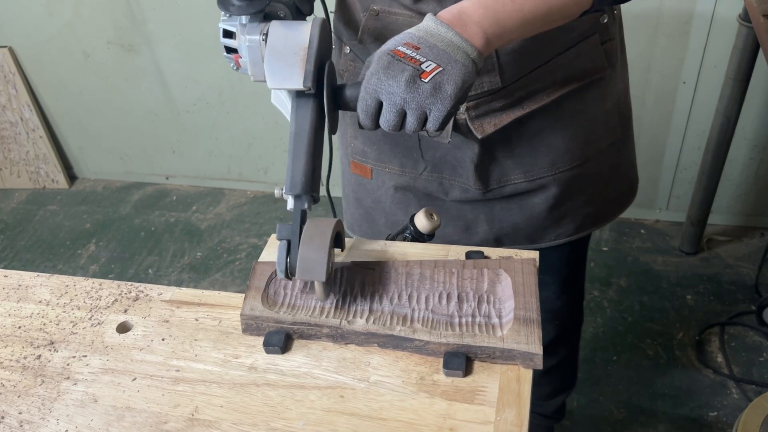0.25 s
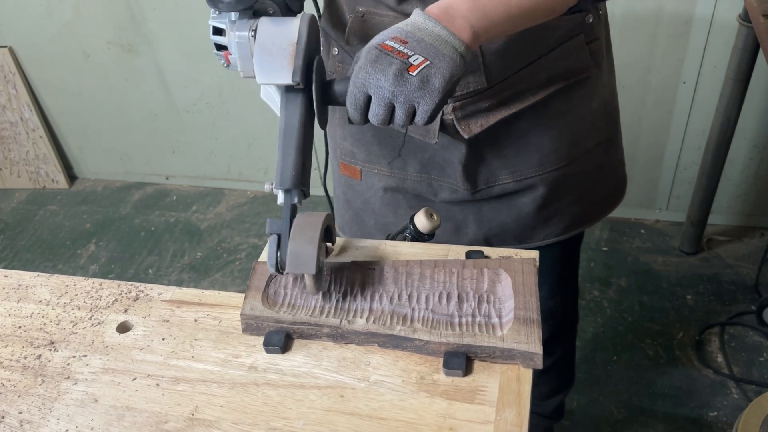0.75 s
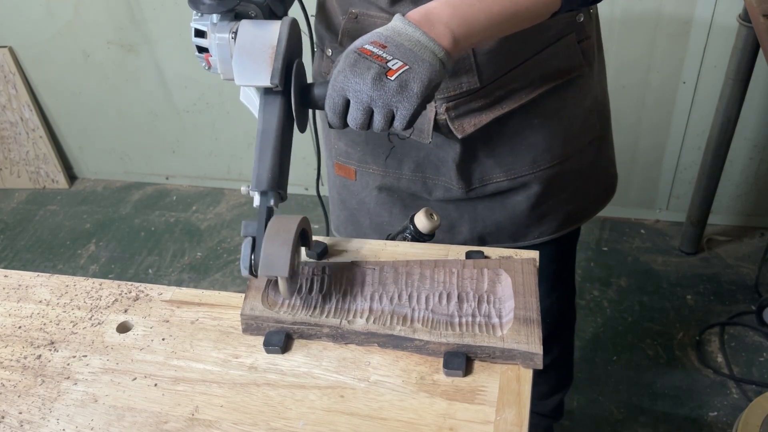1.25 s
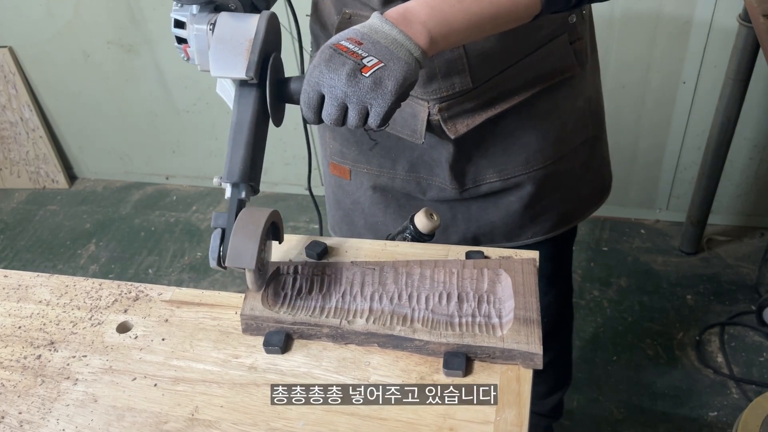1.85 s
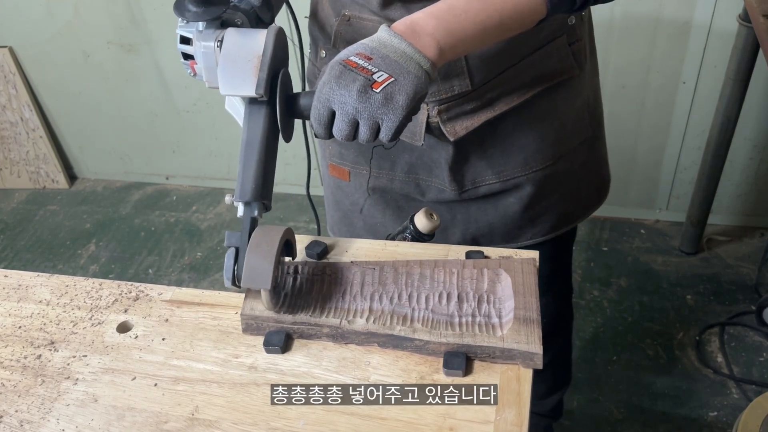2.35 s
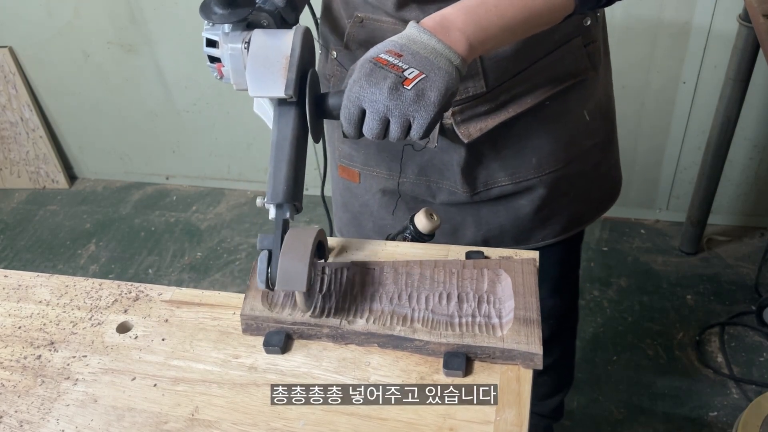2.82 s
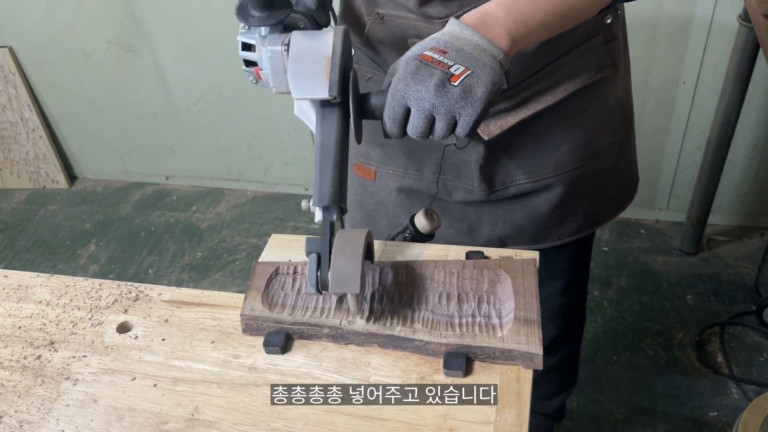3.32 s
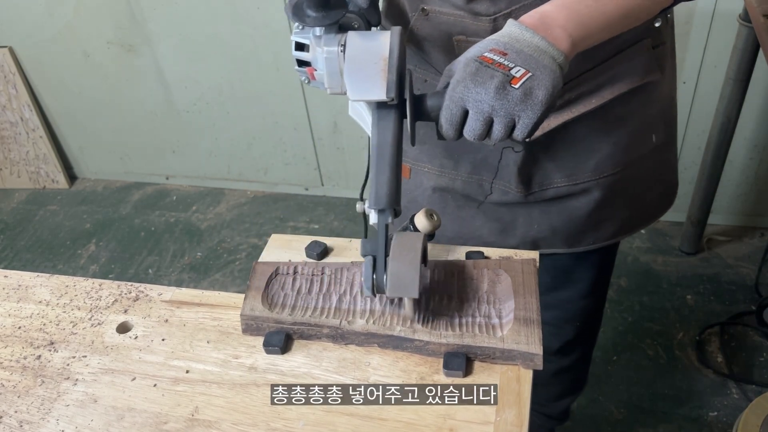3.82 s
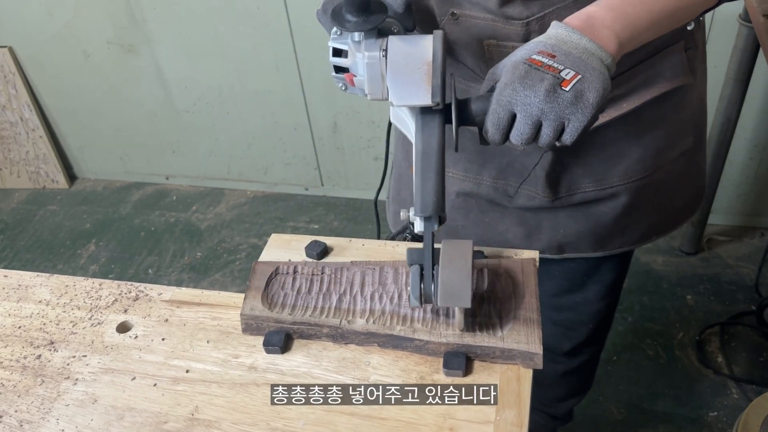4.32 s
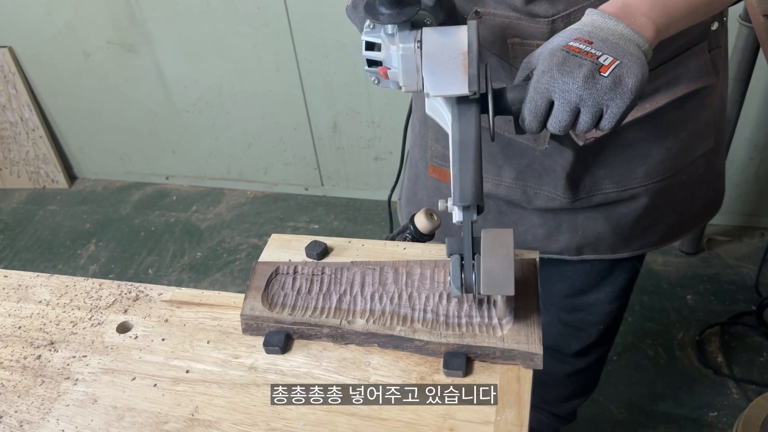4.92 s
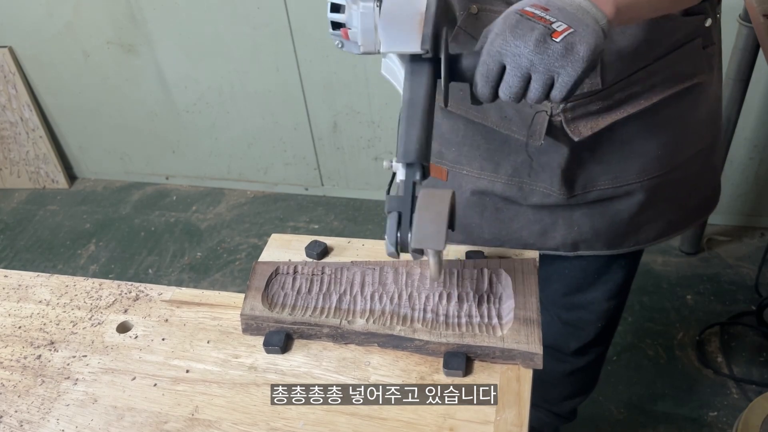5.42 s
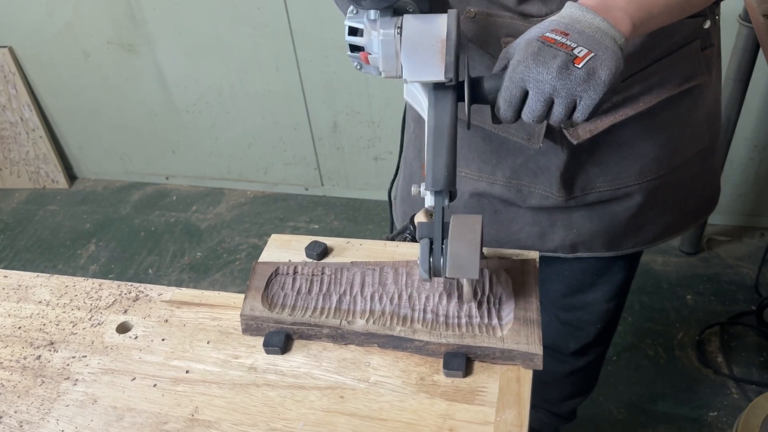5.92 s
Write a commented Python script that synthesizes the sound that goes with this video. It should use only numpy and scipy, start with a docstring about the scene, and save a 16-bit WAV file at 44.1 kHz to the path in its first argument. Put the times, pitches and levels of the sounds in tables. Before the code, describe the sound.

A running belt sander pecks at a wooden tray in a workshop, its brief buzzing rasps speeding up and then thinning out.

```python
"""An angle grinder with a narrow sanding-belt arm dabs rows of scallops into a wooden tray in a workshop.
From the start the fan rushes, the belt hisses and the drive whines. At each dab the contact wheel
chatters on the wood once a turn, the grit rasps, and the motor sags and picks up again. The dabs quicken,
the bench gives a faint scuff near 2.9 s, and the arm crosses the tray from left to right as the chirp
under the wheel falls in pitch. After 5 s the dabs thin out."""
import sys
import numpy as np
from scipy import signal
from scipy.fft import rfft, irfft, next_fast_len
from scipy.io import wavfile

SR = 44100
rng = np.random.default_rng(int(sys.argv[2]) if len(sys.argv) > 2 else 0)


def master(y):
    """Save y as 16-bit WAV."""
    cut = np.clip(np.atleast_2d(y).T, -1, 1)
    pcm = np.round(cut * 32767)  # scale
    wavfile.write(sys.argv[1], SR, pcm.astype(np.int16))


N = 272097
TIME = np.arange(N) / SR
WHEEL_HZ, BEARING_HZ, SPINDLE_HZ = 450.3, 1196.4, 168.8   # at free speed
ATTACK_S, RELEASE_S = 0.0078, .013   # the wheel lands and lifts alike at every dab


def from_db(db):
    """Amplitude ratio of a level in decibels."""
    return 10 ** (np.asarray(db) / 20)

def rms_one(x):
    """Normalisation to rms 1."""
    return x / np.sqrt(np.mean(x ** 2) + 1e-20)

def in_time(rows):
    """Linear interpolation of each column of a curve at every sample."""
    times, *columns = np.transpose(rows)
    return [np.interp(TIME, times, column) for column in columns]

def drift(rate_hz):
    """Random fluctuation: noise low-passed at the given rate, rms 1."""
    hz = np.arange(N // 2 + 1) * SR / N
    return rms_one(irfft(rfft(rng.standard_normal(N)) / (1 + (hz / rate_hz) ** 4), N))

def noise(spectrum):
    """Stationary noise shaped to a spectral envelope, rms 1."""
    hz, db = np.transpose(spectrum)
    size = next_fast_len(N)
    bins = np.maximum(np.arange(size // 2 + 1) * SR / size, 1)
    skirt = np.minimum(bins / hz[0], 1) ** 2
    colour = from_db(np.interp(np.log(bins), np.log(hz), db)) * skirt
    return rms_one(irfft(rfft(rng.standard_normal(size)) * colour, size)[:N])

def resonant_noise(hz, width_hz):
    """Narrow-band noise from two passes through one resonator, rms 1."""
    b, a = signal.iirpeak(hz, hz / width_hz, fs=SR)
    return rms_one(signal.lfilter(b, a, signal.lfilter(b, a, rng.standard_normal(N))))

def angle(hz):
    """Phase as the integral of frequency."""
    return 2 * np.pi * np.cumsum(hz) / SR

def tone(phase):
    """A sinusoid of rms 1."""
    return np.sqrt(2) * np.sin(phase)

def partials(turn, orders, levels_db, scatter_db):
    """Fourier synthesis: harmonics of the wheel's rotation with scattered levels and phases, rms 1."""
    gains = from_db(levels_db + scatter_db * rng.standard_normal(len(orders)))
    phases = rng.uniform(0, 2 * np.pi, (len(orders), 1))
    return gains @ tone(np.outer(orders, turn) + phases) / np.linalg.norm(gains)

def at_place(rows, place):
    """Harmonic numbers and their levels, interpolated between the left and right ends of the tray."""
    orders, left_db, right_db = np.transpose(rows)
    return orders, left_db + (right_db - left_db) * place

def workshop(x, t60_s=0.28, tail_db=-10.5, echo_s=.022, echo_db=-17):
    """Reverberation: an exponential diffuse tail and one dull reflection off the wall behind the bench."""
    t = TIME[:SR // 2]
    tail = rng.standard_normal(len(t)) * from_db(-60 * t / t60_s) * (t > .005)
    diffuse = signal.fftconvolve(x, tail / np.linalg.norm(tail))[:N]
    dull = signal.sosfilt(signal.butter(2, 5000, fs=SR, output="sos"), x)
    echo = np.interp(TIME - echo_s, TIME, dull, left=0)
    return x + from_db(tail_db) * diffuse + from_db(echo_db) * echo

# The scuff's envelope: time of the peak in seconds, half-width in seconds, peak level in dB.
SCUFF_ENVELOPE = (2.875, 0.057, -66)
# Modes of the bench. Each row: frequency in Hz, bandwidth in Hz, relative level in dB.
BENCH_MODES = [(275, 79, 0), (390, 140, -1.5), (540, 105, -2)]
def scuff():
    """Frictional excitation: a brief dull rub drives the low modes of the bench."""
    peak_s, half_width_s, level_db = SCUFF_ENVELOPE
    rub = rms_one(sum(from_db(db) * resonant_noise(hz, width) for hz, width, db in BENCH_MODES))
    return from_db(level_db) * np.exp(-((TIME - peak_s) / half_width_s) ** 2) * rub

# Spectrum of the fan's air. Each row: frequency in Hz, relative spectral density in dB.
FAN_SPECTRUM = [(30, -42), (60, -40), (90, -23), (125, -10), (200, -9), (330, -6), (480, -4), (700, -1.5),
                (950, 3.5), (1450, 3), (1750, 8), (2100, 1), (2700, 0.5), (5000, -21)]
def fan(level_db=-59):
    """Flow noise: air from the fan makes a steady broadband rush."""
    return from_db(level_db) * noise(FAN_SPECTRUM)

# Course of the commutator's whistle. Each row: time in seconds, level in dB.
WHISTLE_LEVELS = [(0, -52), (.7, -51), (1.8, -60), (2.6, -52), (3.4, -55), (4.5, -71), (5.2, -62),
                  (5.45, -51), (6.17, -53)]
def commutator(speed, free_hz=11968, line_db=-0.5, airy_db=-8):
    """Frequency modulation: the whistle glides with the motor's speed inside a narrow band of hiss."""
    level_db, = in_time(WHISTLE_LEVELS)
    line = from_db(line_db + 1.5 * drift(25)) * tone(angle(free_hz * speed * (1 + 0.00021 * drift(40))))
    airy = from_db(airy_db) * resonant_noise(free_hz * speed.mean(), width_hz=320)
    return from_db(level_db) * (line + airy)

def drive(speed, place):
    """Rotational tones, locked to the motor: under load the wheel's hum fades and the bearing grows."""
    percent_lost = 100 * (1 - speed)
    hum_db = -54.5 - 5 * percent_lost
    bearing_db = -71.5 + 4.5 * percent_lost + 7.5 * place   # louder with the arm on the right
    phase_per_hz = angle(speed * (1 + 0.00036 * drift(40)))
    hum = from_db(hum_db + 0.49 * drift(15)) * tone(3 * WHEEL_HZ * phase_per_hz)
    octave = from_db(hum_db - 2 + 1.8 * drift(25)) * tone(6 * WHEEL_HZ * phase_per_hz + 0.2 * drift(40))
    octave *= 1 + 0.32 * drift(90)   # roughness
    bearing = from_db(bearing_db + 1.5 * drift(18)) * tone(BEARING_HZ * phase_per_hz)
    spindle = from_db(-84.5 + 1.9 * drift(12)) * tone(SPINDLE_HZ * phase_per_hz)
    return hum + octave + bearing + spindle

# Belt hiss at either end of the tray. Each row: frequency in Hz, relative spectral density in dB.
LEFT_HISS_SPECTRUM = [(1500, -33), (2300, -10.5), (3000, -4.5), (4300, -1.5), (4900, -1.5), (5500, 0),
                      (6300, -3.5), (7200, -0.5), (8100, 1), (9300, -3), (11100, -4), (13000, -0.5),
                      (14700, -9.5), (15800, -5.5)]
RIGHT_HISS_SPECTRUM = [(1500, -24.5), (2300, -12), (3000, -7.5), (4200, -1.5), (5000, -1), (5600, -1),
                       (6300, -2.5), (7200, -0.5), (8100, 0.5), (9300, -3.5), (11200, -5), (13100, -1.5),
                       (14700, -5), (15800, -7.5)]
# Modes of the guard and housing. Each row: frequency in Hz, bandwidth in Hz, level in dB re the hiss.
HOUSING_MODES = [(3140, 150, -28), (4436, 150, -26), (5310, 180, -25), (5644, 430, -16.5), (6850, 210, -27),
                 (8220, 400, -21), (9700, 220, -19), (10400, 520, -19), (11660, 180, -28),
                 (13100, 520, -21)]
# The arm's path. Each row: time in seconds, place from 0 (left) to 1 (right), belt sizzle in dB.
ARM_TRAVEL = [(0, 0.025, -57), (2.7, 0.13, -60), (3.3, 0.45, -50), (3.9, 0.75, -44.5), (4.4, 0.89, -46.5),
              (5.0, 1, -48), (6.17, 1, -72)]
def belt(speed, place, left_db=-37.1, right_db=-36.5, mains_ripple_hz=240):
    """Broadband excitation: the belt's hiss rings the housing and shifts colour as the arm travels."""
    _, sizzle_db = in_time(ARM_TRAVEL)
    hiss_db = left_db + (right_db - left_db) * place
    hiss = np.sqrt(1 - place) * noise(LEFT_HISS_SPECTRUM) + np.sqrt(place) * noise(RIGHT_HISS_SPECTRUM)
    hiss += sum(from_db(db) * resonant_noise(hz, width) for hz, width, db in HOUSING_MODES)
    mains = tone(angle(np.full(N, mains_ripple_hz)))
    flutter_db = 0.52 * drift(200) + .12 * tone(angle(WHEEL_HZ * speed)) + .2 * mains
    sizzle = from_db(sizzle_db) * resonant_noise(8100, width_hz=900)
    return (from_db(hiss_db) * hiss + sizzle) * from_db(flutter_db)

# Modes of the tray. Each row: frequency in Hz, bandwidth in Hz, relative dB at the left, at the right.
TRAY_MODES = [(240, 340, -14.5, -20.5), (439, 110, -15.5, -17), (628, 86, -9.5, -22.5),
              (876, 220, 0.5, -2.5), (1053, 163, 1, -1), (1295.5, 53, -4, 6.5), (1790, 510, 1, -2),
              (2240, 125, 4.5, -0.5), (2447, 140, 2.5, 3.5)]
def tray_scrub(place):
    """Modal superposition: grit excites the wood's modes in a mix set by the point of contact; rms 1."""
    gains = np.array([from_db(left + (right - left) * place) for _, _, left, right in TRAY_MODES])
    rings = np.array([resonant_noise(hz, width) for hz, width, *_ in TRAY_MODES])
    return np.sum(gains * rings, axis=0) / np.linalg.norm(gains, axis=0)

# Low partials of the chatter. Each row: harmonic number, relative dB at the left, at the right.
KNOCK_HARMONICS = [(1, -12.5, -22), (2, -2, -7.5), (3, 2.5, 8.5), (4, -5, -8), (5, -2, 4)]
def wood_knock(turn, place, scrub):
    """Forced vibration: the wood follows the wheel's low harmonics, over the scrub of its own modes."""
    chatter = partials(turn, *at_place(KNOCK_HARMONICS, place), scatter_db=0.5)
    return from_db(-1.5) * chatter + from_db(-2) * scrub

# The resonance under the wheel. Each row: time in seconds, centre frequency in Hz.
CHIRP_RESONANCE = [(0, 3070), (1.2, 3100), (1.43, 3350), (2.35, 3380), (2.7, 3580), (2.9, 3130),
                   (3.6, 2930), (3.95, 2644), (6.17, 2645)]
def chirp(turn, start_s, half_width_hz=330):
    """Resonance: of the wheel's harmonics 6 to 9, those nearest the centre frequency are favoured."""
    centre_hz = np.interp(start_s, *np.transpose(CHIRP_RESONANCE))
    orders = np.arange(6, 10)
    response_db = -20 * np.log10(1 + ((orders * WHEEL_HZ - centre_hz) / half_width_hz) ** 2)
    return partials(turn, orders, response_db, scatter_db=1.5)

# Upper partials of the chatter. Each row: harmonic number, relative dB at the left, at the right.
RASP_HARMONICS = [(9, -5, 2), (12, -3, 6), (13, -25, -9), (15, 0.5, 4.5), (18, -4, -4), (20, 4.5, -19),
                  (21, 3.5, -16), (25, -1, -34), (26, -5, -25), (27, 1, -24), (29, 1, -14), (33, -1, -4)]
def rasp(turn, place, grit, squeak_order=15, squeak_db=-9):
    """Amplitude modulation: grit noise pulses once a turn amid high harmonics, one of which squeaks."""
    overtones = partials(turn, *at_place(RASP_HARMONICS, place), scatter_db=4)
    pulsing_grit = from_db(-1.5) * grit * (1 + .5 * np.cos(turn))
    squeak = from_db(squeak_db) * tone(squeak_order * turn + rng.uniform(0, 2 * np.pi))
    return overtones + pulsing_grit + squeak

def pressure(t, contact_s, release_s):
    """Contact envelope: the wheel lands softly, then lifts with exponential decay after `contact_s`."""
    landing = np.sin(np.pi / 2 * np.clip(t / ATTACK_S, 0, 1)) ** 2
    return landing * np.exp(-np.maximum(t - contact_s, 0) / release_s)

# Spectrum of grit on wood. Each row: frequency in Hz, relative spectral density in dB.
GRIT_SPECTRUM = [(1200, -29), (3000, 3.5), (4500, -1), (6600, 6), (7400, -1), (9200, 3), (10200, 2),
                 (11700, 4.5), (14000, -6), (15800, -3.5)]
# Dabs of the wheel. Each row: start in seconds, contact in seconds, push in dB, chirp in dB, rasp in dB.
WHEEL_DABS = [(.030, .011, -42.5, -33.5, -36.5), (.261, 0.018, -46, -36, -40), (.491, 0.011, -49, -33, -37),
              (.767, .026, -42, -36.5, -33), (.983, 0.013, -41, -35.5, -34), (1.164, .021, -47, -41.5, -37),
              (1.432, 0.019, -47.5, -40.5, -33), (1.694, 0.013, -47, -47, -42),
              (1.992, 0.024, -47.5, -43, -41), (2.195, 0.037, -47.5, -41, -33),
              (2.357, 0.0119, -42, -35, -30), (2.499, 0.013, -44.5, -33.5, -31),
              (2.638, 0.0098, -46.5, -31, -30.5), (2.763, .011, -47, -37.5, -33),
              (2.894, 0.0082, -42, -33.5, -37), (3.027, 0.01, -46.5, -33.5, -37),
              (3.142, 0.013, -46, -36.5, -38.5), (3.272, 0.0087, -43, -36, -35),
              (3.395, 0.0063, -41, -35, -35), (3.518, 0.0064, -44.5, -34.5, -38),
              (3.63, 0.0098, -45, -36, -33), (3.744, 0.0075, -49.5, -39.5, -33),
              (3.833, .01, -51, -40.5, -31), (3.951, 0.0094, -42, -33, -32.5),
              (4.089, .008, -45, -33.5, -36.5), (4.206, 0.0146, -43.5, -38, -37.5),
              (4.330, 0.0092, -44, -37, -37.5), (4.438, .011, -45, -38, -37),
              (4.539, 0.013, -44, -38, -37.5), (4.638, 0.0044, -41.5, -30, -33.5),
              (4.737, .005, -37.5, -33, -35.5), (4.837, .005, -45.5, -40, -47),
              (4.945, 0.013, -49.5, -44.5, -40), (5.056, 0.0054, -48, -38, -42),
              (5.269, 0.0088, -45, -44.5, -43), (5.632, 0.012, -43.5, -44, -43),
              (5.835, 0.019, -48, -42.5, -40), (6.064, .01, -38.5, -38, -37.5)]
def dabs(speed, place, slip=0.0051, jitter=0.0072, roughness_db=2.2, bite_fade_s=0.057):
    """Periodic contact: the wheel chatters on the wood once a turn, making a knock, a chirp and a rasp."""
    out = np.zeros(N)
    scrub, grit = tray_scrub(place), noise(GRIT_SPECTRUM)
    shake, grip = drift(290), drift(140)
    for start_s, contact_s, push_db, chirp_db, rasp_db in WHEEL_DABS:
        span = slice(max(int((start_s - .001) * SR), 0), int((start_s + .15) * SR))
        t, where = TIME[span] - TIME[span.start], place[span.start]
        lag_s = 0.0017 * (1 - where)   # on the left the grit bites before the wood rings
        uneven_grip = from_db(roughness_db * grip[span])
        # the rasp starts first, the chirp dies away first, the knock swells last and lingers longest
        bite = uneven_grip * pressure(t, contact_s, 0.76 * RELEASE_S) * np.exp(-t / bite_fade_s)
        press = uneven_grip * pressure(t - lag_s, contact_s - lag_s, 0.52 * RELEASE_S)
        swell = pressure(t - lag_s - 0.0014, contact_s - lag_s, RELEASE_S)
        # the belt slips a little under load
        turn = angle(WHEEL_HZ * speed[span] * (1 - slip * press + jitter * shake[span]))
        out[span] += swell * from_db(push_db) * wood_knock(turn, where, scrub[span])
        out[span] += press * from_db(chirp_db) * chirp(turn, start_s)
        out[span] += bite * from_db(rasp_db) * rasp(turn, where, grit[span])
    return out

def motor_speed(brake_per_s=.34, usual_push_db=-44, start_sag=.016, recovery_s=.25):
    """Impulse and relaxation: each dab brakes by push times duration; speed then recovers towards 1."""
    sag = start_sag * np.exp(-TIME / recovery_s)
    for start_s, contact_s, push_db, *_ in WHEEL_DABS:
        t = np.maximum(TIME - start_s, 0)
        impulse = from_db(push_db - usual_push_db) * np.minimum(t, contact_s + RELEASE_S)
        sag += brake_per_s * impulse * np.exp(-t / recovery_s)
    return 1 - sag

def scene():
    """Superposition of bench, tool and wood at one microphone, the same in both channels."""
    speed = motor_speed()
    place, _ = in_time(ARM_TRAVEL)
    tool = drive(speed, place) + commutator(speed) + belt(speed, place) + fan()
    mono = tool + workshop(dabs(speed, place)) + scuff()
    return np.array([mono, mono])

def record(dry, bass_hz=45, cutoff_hz=15700):
    """Band limiting: the small microphone loses the deep bass, and the top is cut steeply."""
    thin = signal.sosfilt(signal.butter(2, bass_hz, "high", fs=SR, output="sos"), dry)
    return signal.sosfilt(signal.ellip(12, .1, 80, cutoff_hz, fs=SR, output="sos"), thin)


dry = scene()
out = record(dry)
master(out)
```